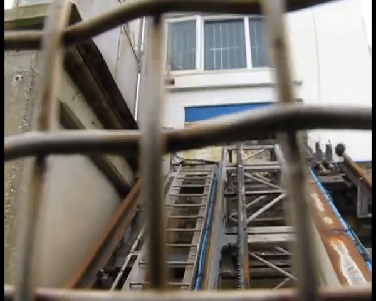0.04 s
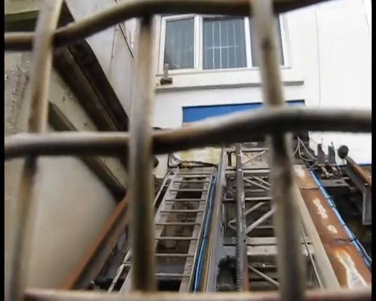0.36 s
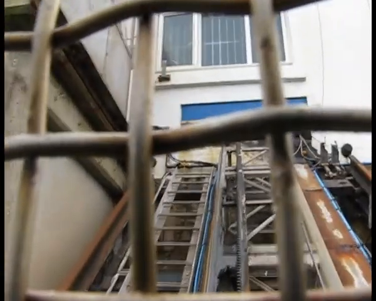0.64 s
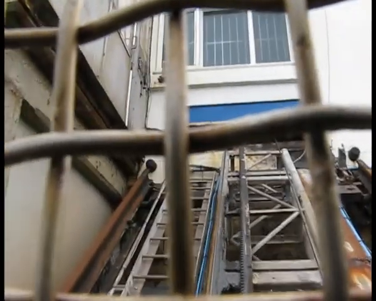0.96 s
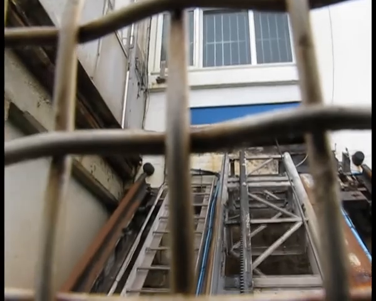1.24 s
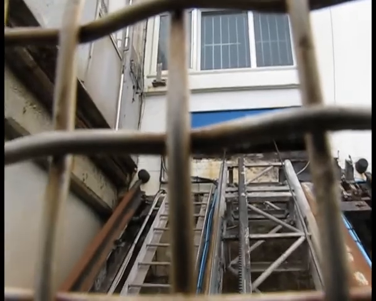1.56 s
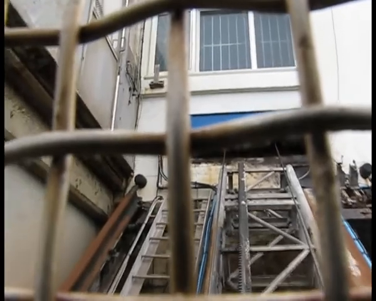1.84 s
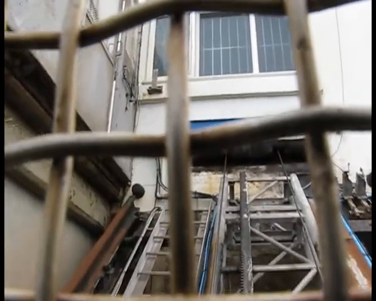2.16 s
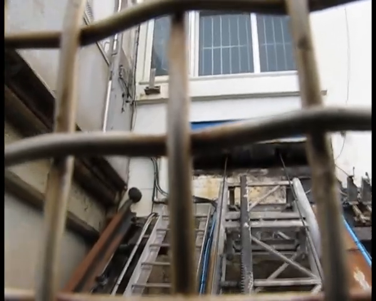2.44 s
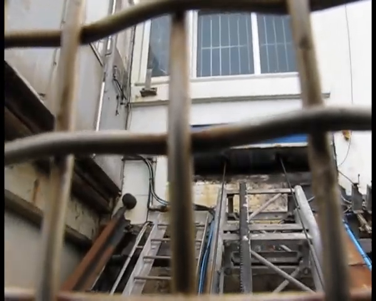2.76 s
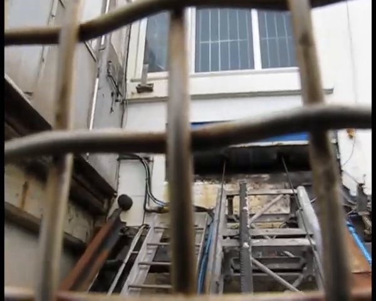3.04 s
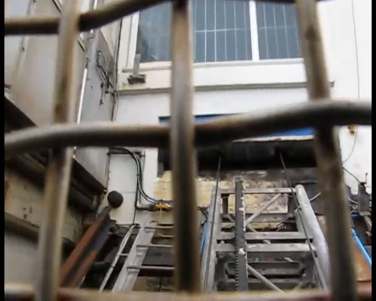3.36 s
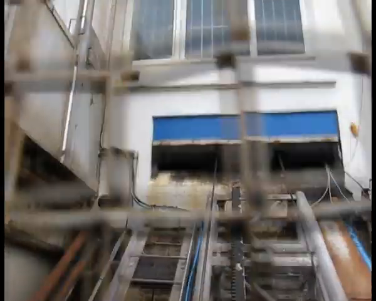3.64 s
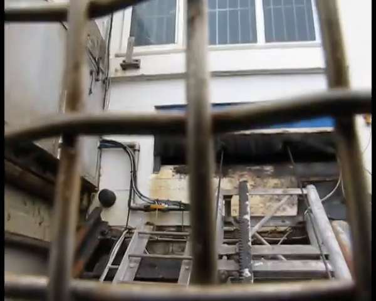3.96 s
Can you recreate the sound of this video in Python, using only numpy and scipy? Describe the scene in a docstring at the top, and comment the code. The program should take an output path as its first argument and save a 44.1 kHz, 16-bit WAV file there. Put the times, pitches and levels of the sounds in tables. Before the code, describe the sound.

A cable railway car rumbles and rattles along, with wind buffeting the microphone.

```python
"""A cable railway car rolls along a steep steel track, heard through its cage with wind on the microphone.
From the start the wheels roar and hiss, the running gear clacks and loose bars rattle; steel scrapes
at 0.2 s. Gusts buffet the microphone, hardest near 1.1 s and 1.8 s; a limiter ducks everything at each
strong one and slowly lets it back. A second scrape comes at 2.9 s, more strong gusts near 3.5 s,
and in the last half second loose metal knocks five times."""
import sys
import numpy as np
from scipy import signal
from scipy.fft import rfft, irfft
from scipy.io import wavfile
from scipy.ndimage import uniform_filter1d

SR = 44100
rng = np.random.default_rng(int(sys.argv[2]) if len(sys.argv) > 2 else 0)


def to_wav(s):
    """Save 16-bit WAV."""
    ch = np.atleast_2d(s).T  # columns
    pcm = np.round(np.clip(ch, -1, 1) * 32767)  # PCM
    wavfile.write(sys.argv[1], SR, pcm.astype(np.int16))


N = 176400
TIME = np.arange(N) / SR

# Envelope of the wheels' roar: t/s, level/dB
ROAR_LEVEL = [(0, -15), (.15, -21.5), (.45, -19), (.6, -20.5), (.95, -18), (1.2, -19), (1.55, -19),
              (1.72, -18), (1.8, -21.5), (1.92, -30), (2.02, -12), (2.2, -21), (2.5, -23.5), (2.8, -19),
              (3.1, -13), (3.25, -23), (3.45, -21), (3.65, -20.5), (4, -23)]
# Spectra of the roar and the hiss: f/Hz, relative level/dB
ROAR_SPECTRUM = [(30, -28.5), (120, -12), (250, -9.5), (450, -1), (650, -4), (1000, -14), (1400, -14),
                 (2000, -27.5), (4000, -51.5), (8000, -80.5)]
HISS_SPECTRUM = [(300, -0.5), (1300, 3.5), (2100, -3.5), (2650, -2), (3050, -6), (3900, -11.5), (4600, -17),
                 (5200, -17.5), (5900, -22.5), (6500, -30), (8300, -39.5), (9500, -56), (12000, -69)]
# Hollow resonances of the car body: f/Hz, level/dB relative to the rolling noise, bandwidth/Hz
BODY_MODES = [(296.2, -8.5, 67), (406.3, -8, 55), (497.76, -7.5, 62), (776.6, -12.5, 45)]
# Thin singing of wheels and cable: f/Hz, level/dB, bandwidth/Hz
SINGING_MODES = [(1991, -51.5, 7.6), (2206, -51.5, 15), (2468, -44.5, 22), (2609.5, -48.5, 39),
                 (2697.7, -45.5, 14), (2895, -47, 5.7), (4200, -60, 55), (5218, -63.5, 14), (5830, -71, 12)]

def wheels(rough_db=1.5, rough_hz=50, hiss_db=-28.5, hiss_rough_db=0.68, swell_db=2, swell_hz=7):
    """Forced vibration: uneven rolling roars, hisses and drives resonances of body, wheels and cable."""
    bumps = flutter(rough_hz)
    body = sum(amp(db) * resonance(hz, width) for hz, db, width in BODY_MODES)
    roar = unit(noise(ROAR_SPECTRUM) + body) * unit(amp(rough_db * bumps)) * level(ROAR_LEVEL)
    hiss = noise(HISS_SPECTRUM) * amp(hiss_db + hiss_rough_db * bumps)
    singing = sum(amp(db) * resonance(hz, width) for hz, db, width in SINGING_MODES)
    return roar + hiss + singing * unit(amp(swell_db * flutter(swell_hz)))


# Clacks of the running gear: t/s, relative peak level/dB
GEAR_CLACKS = [(0.113, -8), (0.248, -13), (0.288, -10), (0.3861, -15.5), (0.4954, -15.5), (0.5413, -13.5),
               (0.591, -9), (0.629, -13.5), (0.768, -19), (0.839, -13.5), (0.8812, -14), (0.9364, -12.5),
               (1.384, -9.5), (1.4983, -18), (1.6554, -12), (1.936, -14), (1.9734, -11), (2.1231, -8.5),
               (2.157, -15), (2.2524, -12.5), (2.2928, -14.5), (2.3342, -15), (2.4328, -15.5), (2.545, -17),
               (2.6381, -10), (2.803, -11.5), (3.003, -10), (3.0449, -16), (3.1445, -10.5), (3.235, -7.5),
               (3.2689, -13), (3.3228, -12.5), (3.4353, -12.5), (3.467, -3.5), (3.5299, -12.5),
               (3.6145, -11), (3.6576, -12.5), (3.697, -11.5), (3.8431, -15.5), (3.9108, -15),
               (3.9772, -15.5)]
# Spectrum of the chafing contact: f/Hz, relative level/dB
CONTACT_SPECTRUM = [(300, -1), (1400, -2.5), (2500, -4.5), (4500, -4), (7000, -29.5), (11000, -57)]
# Modes of the gear's steel: f/Hz, relative level/dB, T60/s
STEEL_MODES = [(780, -9.5, .015), (1180.3, 7, 0.035), (1356.8, 14, 0.0244), (1450, -11, 0.011),
               (1741, -3, 0.069)]

def running_gear(rise_s=0.001875, clack_gain_db=2, chatter_hz=21, chatter_db=-22.5, spread_db=6):
    """Convolution: loud clacks and a loosely regular chatter excite the same damped steel modes."""
    t, grit, out = TIME[:2600], noise(CONTACT_SPECTRUM), np.zeros(N)
    ring = sum(amp(db - 60 * t / t60) * np.sin(2 * np.pi * hz * t) for hz, db, t60 in STEEL_MODES)
    chatter = [((k + .22 * jitter) / chatter_hz, chatter_db + spread_db * strength)
               for k, (jitter, strength) in enumerate(rng.standard_normal(size=(110, 2)))]
    clacks = [(s, db + clack_gain_db) for s, db in GEAR_CLACKS]
    for s, db in chatter + clacks:
        contact = burst(grit, s, rise_s)
        add(out, s - rise_s, peaked(signal.fftconvolve(contact, ring), db))
    return out


# Rattles of the cage: t/s, peak level/dB, emphasised f/Hz, rise time/s
CAGE_RATTLES = [(0.107, -8, 1710, 0.00235), (.526, -11.5, 4200, 0.00143), (0.59, -17.5, 1750, 0.0015),
                (0.919, -6, 1650, 0.00157), (0.933, -12, 1750, 0.00147), (1.312, -4, 1703, 0.00126),
                (2.616, -13, 5030, 0.0047), (3.135, -10, 1890, 0.00296), (3.23, -14, 1900, 0.00146),
                (3.594, -8.5, 3600, 0.00168), (3.611, -15, 1900, 0.0063), (3.661, -18.5, 1620, 0.0022),
                (3.698, -14, 3500, 0.0017), (3.839, -11, 4500, 0.00135), (3.873, -22, 5200, 0.00126),
                (3.912, -12, 1800, 0.00205)]
# Spectrum of the bars' contact: f/Hz, relative level/dB
BAR_SPECTRUM = [(300, -9.5), (1000, 7.5), (1600, 4), (2400, -1), (3100, -14.5), (4000, -10), (4900, -25.5),
                (6200, -36), (8000, -31), (10000, -60)]

def cage(q=4.6, resonance_db=4.5):
    """Resonant filtering: loose bars give short, bright noise bursts, each with one band lifted."""
    grit, out = noise(BAR_SPECTRUM), np.zeros(N)
    for s, db, hz, rise_s in CAGE_RATTLES:
        contact = burst(grit, s, rise_s)
        band = signal.lfilter(*signal.iirpeak(hz, q, fs=SR), contact)
        add(out, s, peaked(contact + amp(resonance_db) * band, db))
    return out


# Knocks of loose metal: t/s, peak level/dB
METAL_KNOCKS = [(3.5652, -9), (3.7935, -12), (3.8102, -6.5), (3.9095, -14), (3.929, -5.5)]
# Modes of that metal: f/Hz, relative level/dB, T60/s
METAL_MODES = [(1150, -9.5, 0.013), (1525, 0, 0.018), (1883, 3.5, 0.011), (2410, 0.5, 0.0096),
               (2800, -3, 0.0084), (3500, -4.5, .01), (3954, -6.5, .014), (7300, -3.5, 0.009),
               (8600, -0.5, .008)]

def knocks(contact_s=0.00039, roughness=.3, rebound_s=.0045, rebound_db=-11):
    """Impact excitation: loose metal strikes hard, rings very briefly and rebounds once."""
    t, out = TIME[:1800], np.zeros(N)
    lowpass = signal.windows.blackman(15)
    rebounds = [(s + rebound_s, db + rebound_db) for s, db in METAL_KNOCKS]
    for s, db in METAL_KNOCKS + rebounds:
        ring = sum(amp(mode_db - 60 * t / t60) * np.sin(2 * np.pi * (hz * t + rng.random()))
                   for hz, mode_db, t60 in METAL_MODES)
        contact = (t == 0) + roughness * rng.standard_normal(len(t)) * np.exp(-t / contact_s)
        force = signal.convolve(contact, lowpass)
        add(out, s, peaked(signal.fftconvolve(force, ring), db))
    return out


# Scrapes of steel: t/s, relative level/dB
STEEL_SCRAPES = [(0.164, -22.5), (2.918, -17)]
# Spectrum of the rubbing: f/Hz, relative level/dB
FRICTION_SPECTRUM = [(500, -27.5), (1100, -1), (1600, 2.5), (2400, -0.5), (3100, -14), (4200, -34),
                     (6500, -45.5), (8800, -42.5), (10000, -75.5)]

def scrapes(rise_s=0.018, fade_s=0.0405, grain_db=1.2, grain_hz=150):
    """Sliding friction: steel rubs on steel, and grainy noise swells quickly and decays exponentially."""
    envelope = np.zeros(N)
    for s, db in STEEL_SCRAPES:
        swell = np.clip((TIME - s) / rise_s, 0, 1)
        fade = np.exp(-np.maximum(TIME - s - rise_s, 0) / fade_s)
        envelope += amp(db) * swell * fade
    return envelope * noise(FRICTION_SPECTRUM) * amp(grain_db * flutter(grain_hz))


# Gusts: t/s, duration/s, peak level/dB, initial f/Hz, final f/Hz, turbulence/dB relative to the swirl
GUST_EDDIES = [(0, 0.0677, -4.5, 91.5, 302.3, -3.5), (0.095, 0.0104, -2, 127, 170.2, 5),
               (.645, 0.0143, -2, 95, 109.6, -14), (.765, 0.0118, -1.5, 110.6, 110, -8),
               (1.014, 0.0137, 2.5, 195.4, 174.5, -7), (1.028, 0.0351, -1, 189.9, 157, -5.5),
               (1.052, 0.0268, 4, 130, 166, -7.5), (1.084, 0.0193, 7.5, 294.5, 262.7, -4.5),
               (1.105, 0.045, -4.5, 246, 180, 9.5), (1.315, 0.0112, -1.5, 155, 140, 2),
               (1.334, 0.0224, -3, 159.2, 190, -5.5), (1.392, 0.0123, -2.5, 198, 120, -9.5),
               (1.623, 0.0244, 3.5, 157, 211.4, -10.5), (1.649, 0.0247, 0.5, 248, 250, -3.5),
               (1.743, 0.0284, 3.5, 259.1, 248.6, -6), (1.822, 0.016, 0.5, 330.9, 329, -4),
               (1.84, 0.0231, 9, 279.7, 292.2, -0.5), (2.001, 0.059, -0.5, 233.5, 279.8, -5),
               (2.33, 0.0175, -2, 301.3, 296.7, -9.5), (3.143, 0.0216, -1, 192.3, 89.8, -5),
               (3.376, 0.0334, -7.5, 172.5, 90, -8.5), (3.403, 0.0469, 3, 161.9, 302.3, -5.5),
               (3.445, 0.0346, 5, 185.6, 417.6, -7.5), (3.48, 0.0319, 6.5, 379.6, 285, -2),
               (3.513, 0.0314, 4, 256.6, 250.5, -5), (3.542, 0.0135, -3, 190.4, 151, -10),
               (3.889, 0.0383, -2, 192.8, 283, -2), (3.933, 0.0103, 0.5, 237.7, 202, -4)]
# Spectrum of their turbulence: f/Hz, relative level/dB
GUST_SPECTRUM = [(20, -11.5), (60, -4), (110, 6), (160, -4), (280, 0.5), (500, -3), (800, -9.5),
                 (1400, -16), (2500, -36), (5000, -52.5), (10000, -74.5)]

def gusts(drive=0.77, wander_depth=0.1656, wander_hz=70, rise_s=0.003715, fade_s=0.0047):
    """Saturation: strong eddies, each a gliding swirl in turbulence, overdrive the microphone."""
    air, wander, out = noise(GUST_SPECTRUM), flutter(wander_hz), np.zeros(N)
    for s, length, db, from_hz, to_hz, turbulence_db in GUST_EDDIES:
        drift = cut(wander, s, length + .03)  # room for the fade
        t = np.arange(len(drift)) / SR
        hz = np.interp(t, [0, length], [from_hz, to_hz]) * np.exp(wander_depth * drift)
        turns = rng.random() + np.cumsum(hz) / SR
        eddy = np.sin(2 * np.pi * turns) + amp(turbulence_db) * unit(cut(air, s, len(t) / SR))
        envelope = (1 - np.exp(-(t / rise_s) ** 2)) / (1 + np.exp((t - length) / fade_s + 1))
        rounded = np.tanh(drive * peaked(eddy * envelope, 0))
        add(out, s, peaked(rounded, db))
    return out


# Single slaps of air: t/s, peak level/dB, nominal f/Hz
AIR_SLAPS = [(.0925, 0, 334), (1.312, 1.5, 191.3), (1.755, 5.5, 560), (1.8451, 1.5, 517), (2.036, 6.5, 325),
             (2.2325, 0, 400), (2.336, -6.5, 397), (2.9025, -9.5, 600), (3.437, 3, 740), (3.7922, 1, 667)]

def slaps(decay_cycles=0.23, bend=0.256, bend_hz=300):
    """Damped oscillation: a sudden push of air swings the microphone unevenly once or twice."""
    drift, out = flutter(bend_hz), np.zeros(N)
    for s, db, hz in AIR_SLAPS:
        turns = np.cumsum(hz * np.exp(bend * cut(drift, s, .04))) / SR
        envelope = turns ** 2 * np.exp(-turns / decay_cycles)
        add(out, s, peaked(np.sin(2 * np.pi * turns) * envelope, db))
    return out


# Envelope of the continuous wind: t/s, level/dB
WIND_LEVEL = [(0, -18), (.15, -17.5), (.5, -19.5), (.75, -16), (1.05, -18.5), (1.2, -13), (1.4, -14),
              (1.55, -22.5), (1.7, -12.5), (1.82, -13.5), (1.9, -20.5), (2.03, -10.5), (2.3, -14.5),
              (2.5, -17.5), (2.85, -17), (3.2, -13.5), (3.5, -19), (3.7, -20), (4, -13.5)]
# Spectrum of the wind: f/Hz, relative level/dB
WIND_SPECTRUM = [(15, -18), (30, -10.5), (55, -2.5), (100, 1), (160, 3), (260, -1.5), (450, -9),
                 (900, -27.5), (2000, -52.5), (6000, -85)]

def wind(lumpy_db=-0.5, eddy_hz=45):
    """Turbulence: fluctuating pressure at the microphone makes a low, lumpy rumble."""
    return noise(WIND_SPECTRUM) * unit(amp(lumpy_db * flutter(eddy_hz))) * level(WIND_LEVEL)


def noise(spectrum):
    """Spectral shaping: noise of rms 1, with nothing above the spectrum's last point."""
    hz, db = np.transpose(spectrum)
    f = np.fft.rfftfreq(N, 1 / SR)
    gain = amp(np.interp(np.log(f + 1), np.log(hz), db, right=-np.inf))
    return unit(irfft(rfft(rng.standard_normal(N)) * gain, N))


def flutter(rate_hz):
    """Random fluctuation of rms 1, up to about the given rate."""
    f = np.fft.rfftfreq(N, 1 / SR)
    gain = f / (f + rate_hz / 10) / (1 + (f / rate_hz) ** 2)
    return unit(irfft(rfft(rng.standard_normal(N)) * gain, N))


def resonance(hz, width_hz):
    """Random excitation: a shaken mode gives narrowband noise, rms 1."""
    envelope = flutter(width_hz) + 1j * flutter(width_hz)
    return unit((envelope * np.exp(2j * np.pi * hz * TIME)).real)


def burst(grit, s, rise_s):
    """Transient friction: a brief chafing contact swells and dies."""
    part = cut(grit, s, .05)
    age = np.arange(len(part)) / SR / rise_s
    return part * age * np.exp(-age)


def amp(db):
    """Decibels to amplitude ratio."""
    return 10 ** (np.asarray(db) / 20)


def level(curve):
    """Gain along a curve of t/s, level/dB."""
    return amp(np.interp(TIME, *np.transpose(curve)))


def unit(x):
    """Normalisation to rms 1."""
    return x / np.sqrt(np.mean(x ** 2) + 1e-20)


def peaked(x, db):
    """Normalisation to a peak level."""
    return amp(db) * x / (abs(x).max() + 1e-12)


def cut(x, s, length):
    """A stretch of a signal, continued periodically."""
    return np.take(x, round(s * SR) + np.arange(round(length * SR)), mode="wrap")


def add(mix, s, sound):
    """Superposes a sound at time s."""
    part = mix[max(round(s * SR), 0):][:len(sound)]
    part += sound[:len(part)]


def scene():
    """Superposition: the car and the wind sum at one microphone."""
    return (wheels() + running_gear() + cage() + knocks() + scrapes() + gusts() + slaps() + wind())[None]


def record(dry, ceiling_db=-2.5, recovery_db_per_s=18.5, cutoff_hz=11500):
    """Peak limiting: the gain drops at once at each high peak and recovers slowly; a low-pass follows."""
    over_db = np.maximum(20 * np.log10(abs(dry[0]) + 1e-9) - ceiling_db, 0)
    recovery_db = TIME * recovery_db_per_s
    held_db = np.maximum.accumulate(over_db + recovery_db) - recovery_db
    duck_db = uniform_filter1d(held_db, size=60)
    limited = np.clip(dry * amp(-duck_db), -1, 1)
    lowpass = signal.firwin(255, cutoff_hz, window=("kaiser", 9), fs=SR)
    return signal.oaconvolve(limited, lowpass[None], "same")


dry = scene()
out = record(dry)
to_wav(out)
```